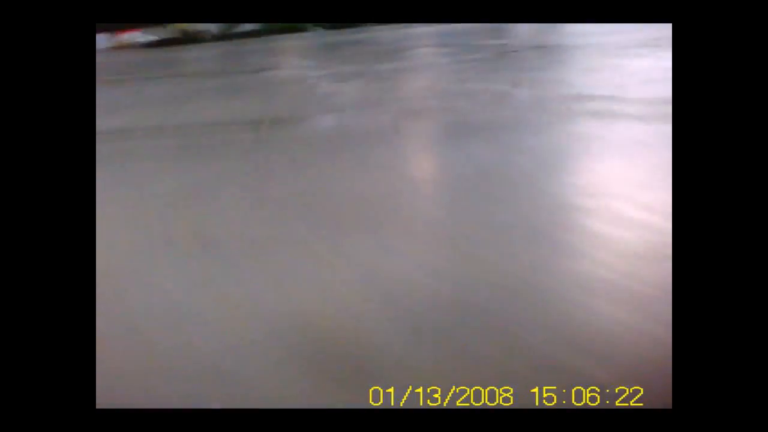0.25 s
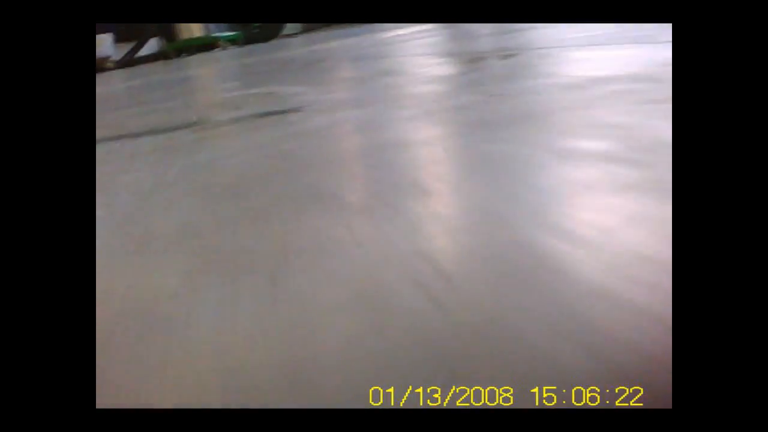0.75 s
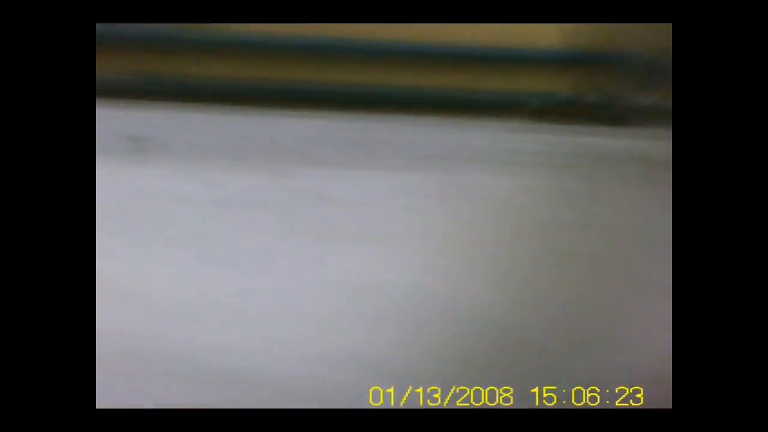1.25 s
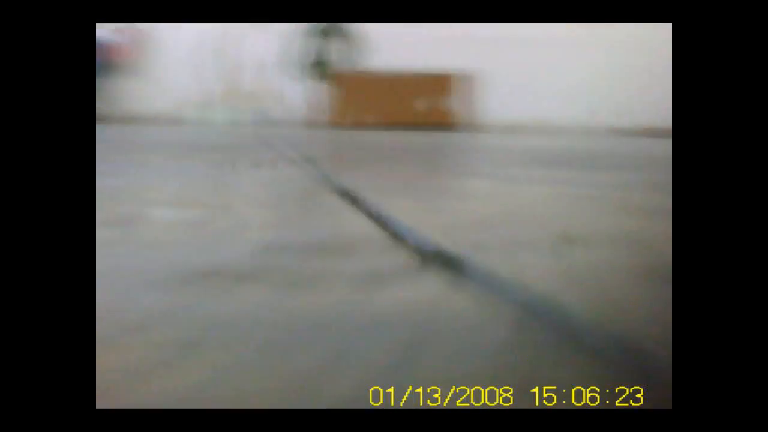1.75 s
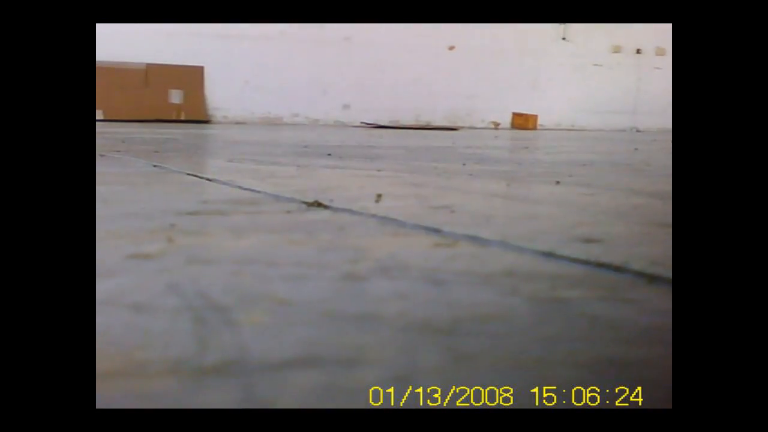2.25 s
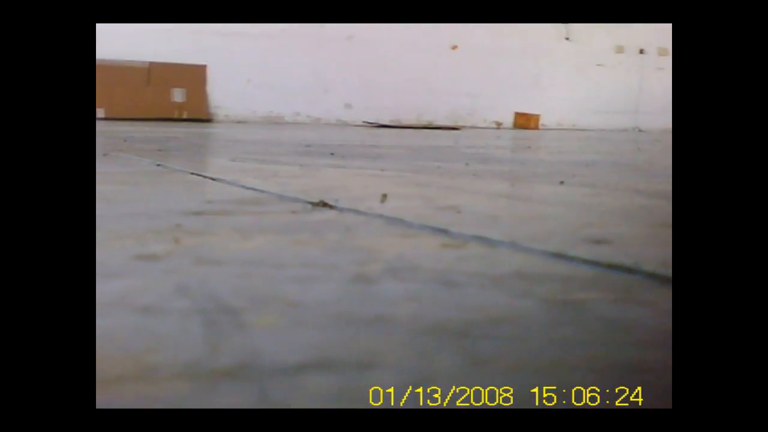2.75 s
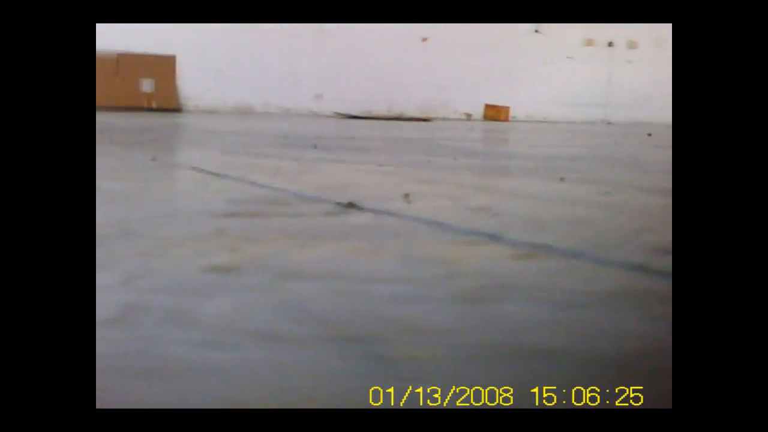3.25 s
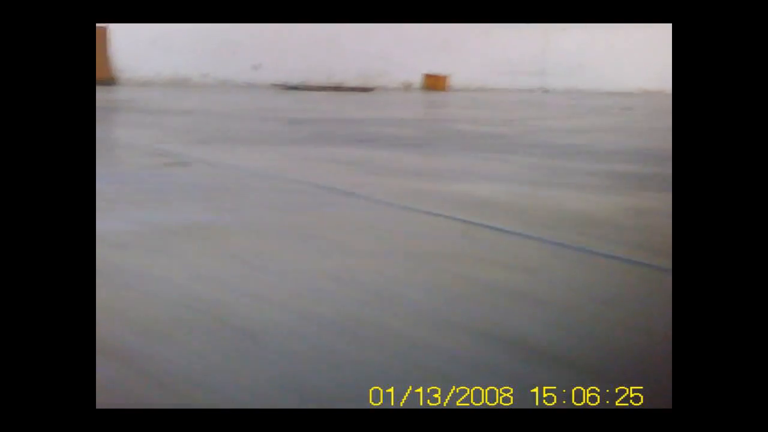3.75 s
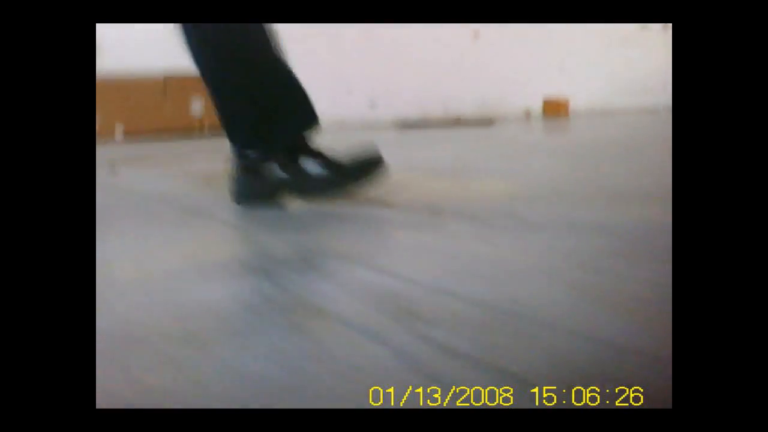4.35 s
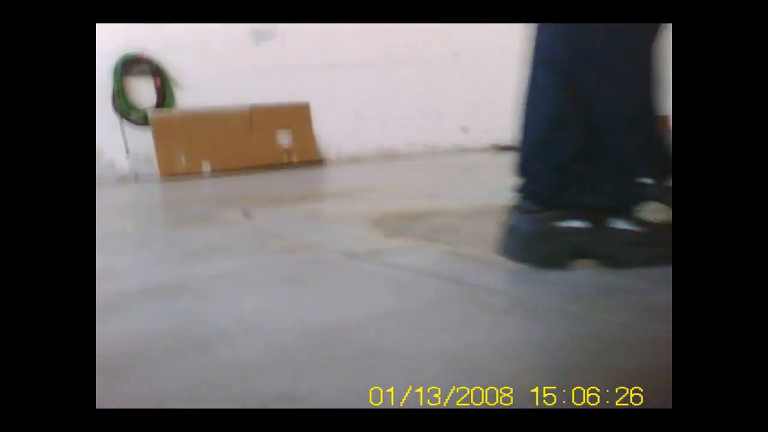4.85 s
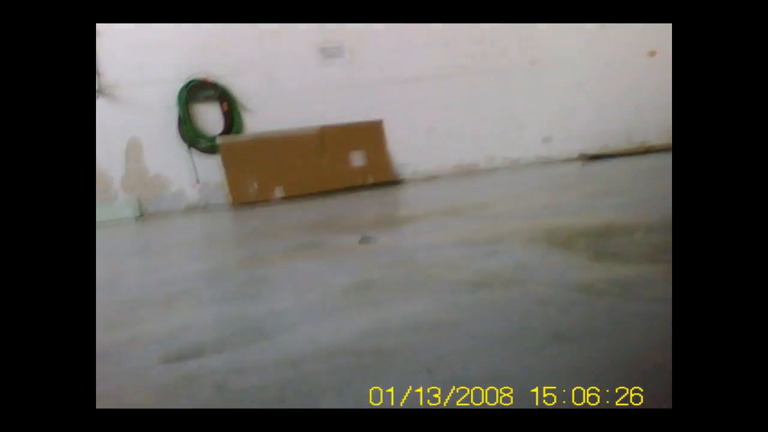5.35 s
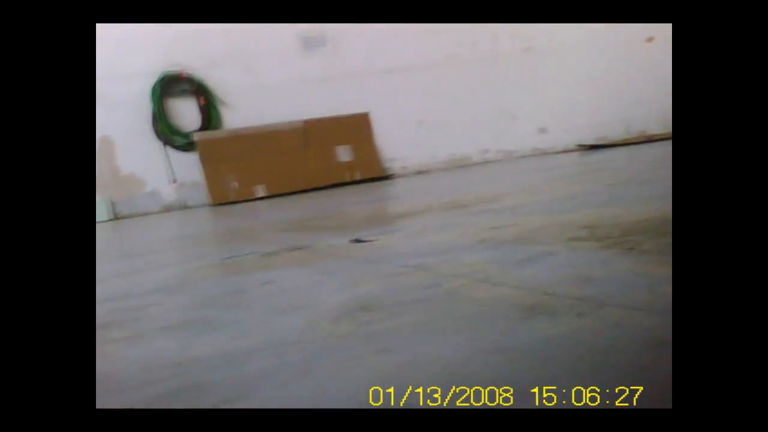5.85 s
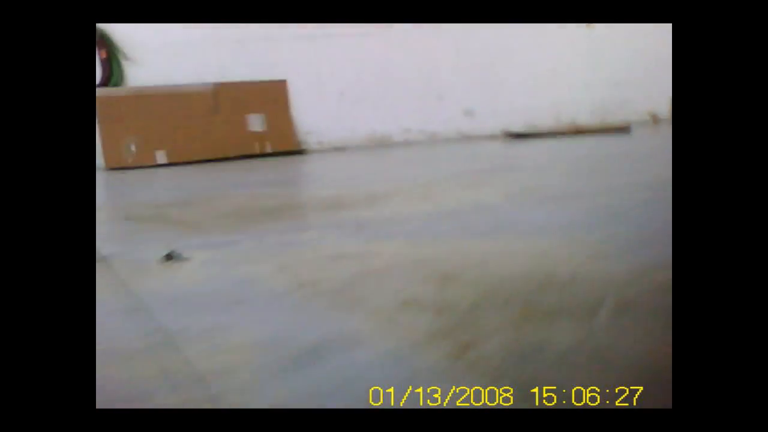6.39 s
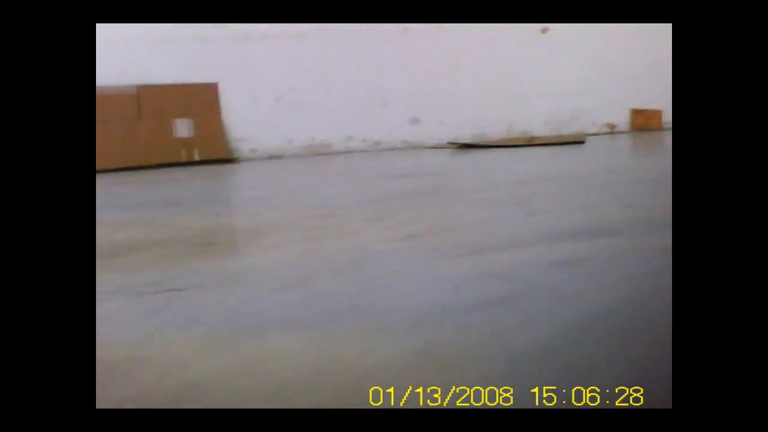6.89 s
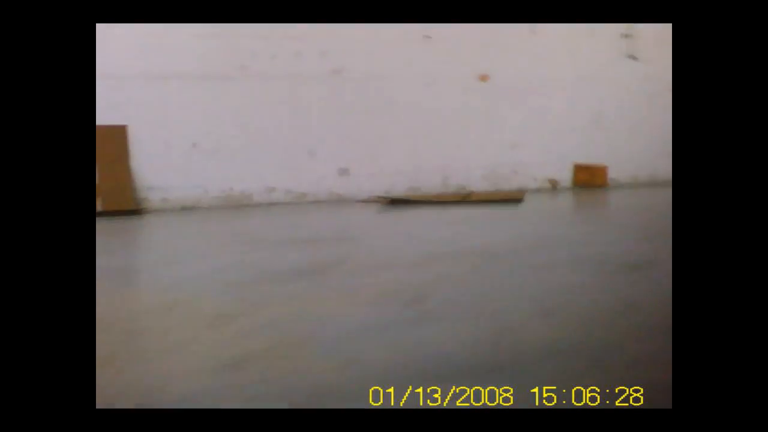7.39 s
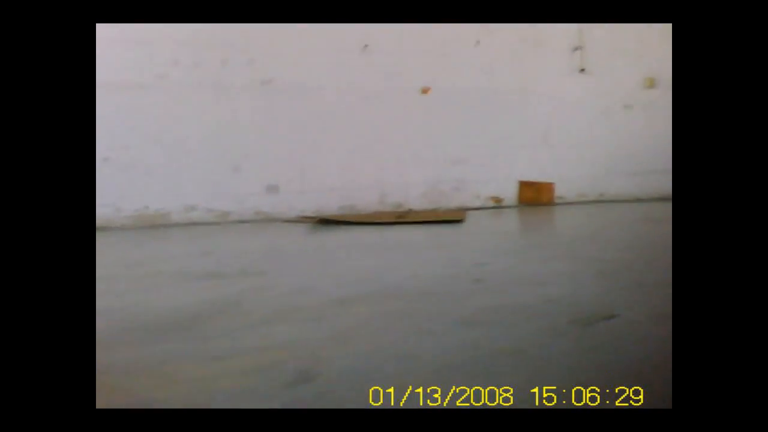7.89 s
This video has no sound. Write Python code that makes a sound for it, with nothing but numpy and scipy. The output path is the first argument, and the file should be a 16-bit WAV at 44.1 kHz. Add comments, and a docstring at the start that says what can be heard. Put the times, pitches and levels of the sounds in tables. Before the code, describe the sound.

Heard from on board, the small electric motor of a radio-controlled helicopter whirs with a high, hissy gear whine. It winds down and stutters as the machine skids over a hard hangar floor with a quick clatter of knocks. The whine climbs again, loud and raspy, briefly overloading the microphone with pops, then levels off into a steady whir that slowly grows louder above a faint low hum.

```python
"""A toy helicopter on a hangar floor, heard from a small camera riding on its plastic frame.
At first the motor runs steadily: gear teeth hiss and whine, the speed controller sings one note, the
tail motor wavers. Near 1 s the motor sags and the machine skids round, knocking and scraping. From
2.2 s it spools up; the microphone pops and overloads on one side of the wave. At the loudest whine the
camera's volume and clipping level drop abruptly, then creep back up as the motor runs on at speed."""
import sys
import numpy as np
from scipy import signal
from scipy.fft import rfft, irfft
from scipy.io import wavfile
from scipy.ndimage import uniform_filter1d

SR = 44100
rng = np.random.default_rng(int(sys.argv[2]) if len(sys.argv) > 2 else 0)


def digitize_waveform(pressure):
    """Quantize a signal to 16-bit integers and store it at the path in sys.argv[1].

    Rows of a 2-D input are taken as channels; values are limited to [-1, 1].
    """
    field = np.atleast_2d(pressure).T
    bounded = np.clip(field, -1, 1)
    quanta = np.round(bounded * 32767).astype(np.int16)
    wavfile.write(sys.argv[1], SR, quanta)


N = 358533
T = np.arange(N) / SR
PINION_TEETH = 9

# tooth rate of the motor pinion: t/s, f/Hz
TOOTH_RATE = [(0.0, 2776), (0.3, 2749), (0.9, 2762), (1.0, 2662), (1.2, 2275), (1.3, 2138), (1.4, 2030),
              (1.6, 1867), (1.9, 1682), (2.2, 1534), (2.3, 1554), (2.4, 1609), (2.5, 1725), (2.7, 1964),
              (2.9, 2194), (3.2, 2452), (3.5, 2654), (3.75, 2757), (4.1, 2771), (4.5, 2753), (5.0, 2762),
              (5.75, 2813), (6.25, 2783), (6.6, 2821), (7.25, 2833), (8.13, 2808)]
# the drive as heard: t/s, gear hiss/dB, frame drone/dB re hiss, controller note/dB re hiss
DRIVE_LEVELS = [(0.0, -36.5, 0.5, -5.5), (0.9, -33.5, -0.5, -5.5), (1.1, -39, 7, -5.5),
                (1.45, -39.5, 4.5, -6), (2.04, -43.5, 4, -6), (2.26, -36, 1.5, -11), (2.62, -33.5, -1, -15),
                (2.77, -38.5, 3.5, -11), (3.0, -39.5, 3.5, -9), (3.3, -38, 0, -11.5), (3.9, -35, -1, -8),
                (4.7, -31.5, -2, -8), (5.4, -30.5, -1, -8.5), (6.2, -27, -1.5, -9), (8.13, -27.5, -1, -8.5)]
# upper and topmost resonances of the frame: f/Hz, width/Hz, relative level/dB
HIGH_MODES = [(3624, 414, 1.5), (4143, 570, -4), (4420, 440, 0.5), (4682, 114, -3.5)]
TOP_MODES = [(5436, 980, -7.5), (6200, 270, -7), (6572, 610, -2), (7700, 860, -17.5), (8400, 1480, -12.5),
             (9055, 520, -10), (10170, 520, -20.5)]
# skids scraping the floor: t/s, level/dB
SCRAPE = [(0.86, -43), (0.94, -36), (1.06, -39), (1.26, -37), (1.38, -31.5), (1.52, -36.5), (1.81, -34),
          (2.0, -42), (2.12, -50)]


def gears(turn):
    """Teeth rub and tick, harder once a shaft turn; four ranges of the frame carry it to the camera."""
    # frame resonances of the drone, and those only fast teeth reach: f/Hz, width/Hz, relative level/dB
    low_modes = [(755, 61, -16.5), (1001, 330, -15), (1242, 543, -5.5), (1507, 177, -3), (1929, 430, 2.5),
                 (2080, 143, 1.5), (2392, 204, -7)]
    mid_modes = [(2708, 280, -3), (3057, 400, 0)]
    # shaft tones: multiple of the shaft rate, relative level/dB
    shaft_tones = [(1, -10.5), (3, -19.5), (4, -23), (5, -26), (6, -32), (7, -29.5), (8, -28), (10, -27),
                   (12, -27.5), (14, -33), (15, -23.5), (18, -15), (27, -19.5)]
    hiss_db, drone_db, _ = curves(DRIVE_LEVELS)
    speed = curves(TOOTH_RATE)[0] / TOOTH_RATE[-1][1]
    mid_db = -11 + 12 * np.log2(speed)
    top_db = -8 - 1.5 * (1 - pull())
    grain = np.repeat(np.minimum(rng.exponential(size=N // 24 + 1), 3.5), 24)[:N]
    pulse = 1 + 0.17 * np.cos(turn) + 0.088 * np.cos(turn / 2)
    shaft = undb(-17 + 19.5 * pull()) * tones(turn + 0.12 * walk(30), shaft_tones)
    imbalance = speed ** 5  # low shaft tones grow steeply with speed
    out, shared_db = 0, hiss_db + .5 * walk(17)
    for modes, db, grain_db, shaft_gain in ((low_modes, drone_db, 1.2, imbalance),
                                            (mid_modes, mid_db, 1.5, 1),
                                            (HIGH_MODES, 0, 2.2, 1), (TOP_MODES, top_db, 2, 1)):
        teeth = unit(rng.standard_normal(N) * undb(grain_db * grain) * pulse)
        ringing = unit(resonate(teeth + shaft * shaft_gain, modes, steep=2.27))
        out = out + ringing * undb(shared_db + db + .5 * walk(7.5))
    return out


def whine(turn):
    """The tooth tone: pulsing and with partner tones under load, in bare throbs when the teeth part."""
    # loaded teeth, loudest as the motor climbs through the frame resonance: t/s, level/dB
    loaded_levels = [(0, -53), (.9, -56), (1.15, -46.5), (1.3, -51), (2.15, -48.5), (2.25, -28),
                     (2.31, -28.5), (2.36, -19), (2.39, -24), (2.44, -21), (2.485, -26), (2.555, -17),
                     (2.6, -19), (2.6345, -14), (2.635, -18), (2.76, -19), (2.83, -27), (3, -33),
                     (3.15, -33.5), (3.4, -46), (3.8, -54), (5.1, -46), (5.5, -50), (8.13, -58)]
    # unloaded teeth meet and part while the rotor overruns the motor: t/s, level/dB, half length/s
    throbs = [(1.28, -30, .006), (1.351, -23, .005), (1.399, -27, 0.015), (1.449, -22, 0.0054),
              (1.481, -22.5, 0.016), (1.534, -19, 0.016), (1.573, -22.5, .01), (1.617, -19.5, 0.01),
              (1.668, -29.5, 0.015), (1.701, -29, 0.015), (1.747, -29.5, .012), (1.789, -37, .006),
              (1.951, -30, 0.0047), (2.005, -38, .009), (2.035, -40, .008), (2.083, -31.5, 0.0066),
              (2.127, -40, .011), (2.17, -35, .008)]
    # partner tones: multiple of the shaft rate, level/dB re the loaded whine before any lift
    partners = [(6, -29), (8, -29), (10, -30), (18, -32), (27, -39), (36, -46), (45, -45)]
    # frame resonances that lift a passing partner: f/Hz, width/Hz, gain/dB
    lifts = [(1520, 110, 12), (1980, 240, 17), (6600, 700, 14)]
    pulse_hz, pulse_peak_s, pulse_db, sputter_db = 16.4, 2.628, 2, 4
    pulse = np.cos(2 * np.pi * pulse_hz * (T - pulse_peak_s))
    level = loaded = undb(curves(loaded_levels)[0] + pulse_db * pulse)
    for s, db, half_length in throbs:
        level = level + undb(db) * bell(T, s, half_length)
    # uneven teeth shake size and timing of the tone, which puts a rasp around it
    tooth = (1 + 0.24 * walk(350)) * np.sin(PINION_TEETH * turn - 2 * np.pi / 5 + 0.12 * walk(300))
    shaft_hz = curves(TOOTH_RATE)[0] / PINION_TEETH
    lifted = [(k, db + sputter_db * walk(30.03) + bumps(k * shaft_hz, lifts)) for k, db in partners]
    # a tone one shaft multiple above twice the tooth rate comes in late
    upper_db = np.interp(T, (4.7, 4.2, 6.3), (-71, -63, -46)) + 2 * walk(10)
    upper = undb(upper_db) * np.sin((2 * PINION_TEETH + 1) * turn + 1.3 * walk(30))
    return np.sqrt(2) * (level * tooth + upper) + loaded * tones(turn + .025 * walk(200), lifted)


def skids():
    """Skids just under the camera scrape and knock; a knock is a dull ring, thud, tick and frame ring."""
    # knocks on the floor: t/s, dull ring gain/dB, f/Hz, frame ring/dB, tick peak/dB
    knocks = [(0.915, -16.5, 1306, -31, -34), (0.928, -18.5, 1320, -36, -37), (0.992, -27, 1290, -23, -32),
              (1.074, -29.5, 1170, -15.5, -38), (1.122, -16, 990, -25, -21), (1.157, -33, 1340, -23, -45),
              (1.212, -18.5, 1550, -30, -31), (1.234, -19, 1090, -32, -28.5), (1.315, -20.5, 920, -23, -24),
              (1.343, -17, 1100, -30, -34), (1.383, -18.5, 1080, -30, -27), (1.404, -19.5, 1090, -23, -36),
              (1.463, -29, 1090, -20, -32), (1.572, -24, 1160, -30, -33), (1.617, -29, 1230, -25, -34),
              (1.636, -21, 1210, -35, -47), (1.653, -18.5, 1220, -27, -30), (1.699, -30, 1130, -32, -29),
              (1.763, -29.5, 1050, -23, -33), (1.79, -21.5, 1110, -21.5, -31), (1.857, -26, 1090, -44, -32),
              (1.92, -27, 1080, -32, -38), (1.997, -30.5, 1000, -33, -35)]
    scrape_modes = [(898, 270, -3.5), (1120, 210, 2), (1400, 590, -1)]  # f/Hz, width/Hz, level/dB
    grit = rng.standard_normal(N) * undb(3.8 * walk(69.88))
    out = unit(resonate(grit, scrape_modes)) * undb(curves(SCRAPE)[0]) * sliding()
    t = T[:4000]
    frame_ring = np.sin(2 * np.pi * 1940 * t) * np.exp(1 - t / 0.0048) * t / 0.0056
    thud = undb(-24) * np.sin(2 * np.pi * 45 * t) * np.exp(-t / 0.028)
    for s, db, hz, frame_db, tick_db in knocks:
        ring = np.sin(2 * np.pi * hz * t) * np.exp(-t / 0.0038) * (1 - np.exp(-t / 0.00041))
        burst = rng.standard_normal(len(t)) * np.exp(-t / 0.0096)
        tick = resonate(burst, HIGH_MODES + TOP_MODES)[:len(t)]
        tick = undb(tick_db) * tick / np.abs(tick).max()
        start = int(s * SR)
        out[start:start + len(t)] += undb(db) * (ring + thud) + tick + undb(frame_db) * frame_ring
    return out


def controller(hz=1703):
    """The speed controller chops the motor current and sings one unchanging note."""
    hiss_db, _, note_db = curves(DRIVE_LEVELS)
    return np.sqrt(2) * undb(hiss_db + note_db + 1.2 * walk(10)) * np.sin(2 * np.pi * hz * T)


def tail_motor():
    """Overtones of the tail motor shaft flicker where two bands of the frame pass them."""
    # shaft rate: t/s, f/Hz
    shaft_rate = [(0, 168), (.14, 174.5), (.27, 166.5), (.55, 168), (.76, 175.5), (1, 170), (3.7, 152),
                  (4.1, 168), (4.35, 174.7), (4.65, 169.5), (4.8, 173), (5.1, 172.5), (5.28, 175),
                  (5.6, 166.5), (5.9, 173.5), (6.03, 174), (6.2, 165), (6.85, 167.5), (7.2, 163.5),
                  (7.5, 165.5), (8.13, 166)]
    # pass bands of the frame: f/Hz, half width/Hz
    bands = [(2425, 90), (2625, 110)]
    hz, = curves(shaft_rate)
    turn = 2 * np.pi * np.cumsum(hz) / SR + .05 * walk(30)
    overtones = 0
    for k in (14, 15, 16):
        passed = sum(bell(k * hz, centre, width) for centre, width in bands)
        overtones = overtones + passed * undb(3.5 * walk(9)) * np.sin(k * turn)
    running = (T < 1) | (T > 3.6)
    return np.sqrt(2) * undb(curves(DRIVE_LEVELS)[0] - 17) * overtones * running


def microphone_pops(dent_s=0.00043, thump_s=0.0052):
    """The overloaded microphone pops: short downward dents with a slower rebound and a thump."""
    # pops: t/s, dent level/dB
    pops = [(2.552, -34), (2.609, -33), (2.63, -20), (2.635, -25), (2.661, -31), (2.674, -27), (2.691, -28),
            (2.708, -27), (2.735, -24.5), (2.748, -30)]
    out = 0
    for s, db in pops:
        dent = bell(T, s + dent_s, dent_s)
        rebound = 0.12 * bell(T, s + 5 * dent_s, 3 * dent_s)
        thump = undb(-14) * bell(T, s, thump_s)
        out = out - undb(db) * (dent - rebound + thump)
    return out


def low_hum():
    """A low, unsteady hum near 166 Hz, with a higher ring that grows while the skids slide."""
    # the hum: t/s, level/dB
    hum_levels = [(0, -83), (.2, -62.5), (.75, -69.5), (.94, -60), (1.2, -60), (1.42, -49), (1.55, -54.5),
                  (1.81, -47.5), (2, -54.5), (2.15, -81), (2.4, -66), (2.72, -54), (2.94, -77), (4.1, -70),
                  (4.4, -57), (5.8, -59.5), (6.1, -56), (8.13, -58)]
    # bands of the hum and the ring: f/Hz, width/Hz
    bands = [(166, 20.5), (470, 63)]
    hum_db, = curves(hum_levels)
    hum, ring = (unit(resonate(rng.standard_normal(N), [(hz, w, 0)], steep=2.8)) for hz, w in bands)
    return hum * undb(hum_db) + ring * (undb(-61.5) * sliding() + undb(hum_db - 12.5))


def rumble():
    """A deep rumble that follows the level of the gear hiss."""
    # rumble spectrum: f/Hz, relative level/dB
    spectrum = [(12, -25), (20, 29.5), (126, 3.5), (166, -15.5), (199, -32), (317, -11), (393, -32),
                (800, -6.5), (1040, -27), (1760, -120)]
    hz, db = np.transpose(spectrum)
    f = np.maximum(np.fft.rfftfreq(N, 1 / SR), 1)
    gain = undb(np.interp(np.log(f), np.log(hz), db))
    noise = irfft(rfft(rng.standard_normal(N)) * gain, N)
    return unit(noise) * undb(curves(DRIVE_LEVELS)[0] - 22.5)


def resonate(x, modes, steep=2.0):
    """The path to the microphone: steep resonance peaks, then the notches of the camera case."""
    # colouring of the case: f/Hz, width/Hz, gain/dB
    case = [(4990, 94, -7.5), (6980, 83, -13), (9500, 200, 0.5)]
    f = np.maximum(np.fft.rfftfreq(4096, 1 / SR), 1)
    power = sum(undb(2 * db) / (1 + ((f - hz ** 2 / f) / w) ** 2) ** steep for hz, w, db in modes)
    power = power * undb(2 * bumps(f, case))
    cepstrum = irfft(np.log(power + 1e-12) / 2)
    cepstrum[1:2048] *= 2  # minimum phase: the ringing follows the blow
    cepstrum[2049:] = 0
    return signal.oaconvolve(x, irfft(np.exp(rfft(cepstrum))))[:N]


def pull(coast_s=1.094, cut_s=0.05, throttle_on_s=2.2, bite_s=.4):
    """1 while the motor drives the rotor, 0 while it coasts."""
    return np.clip(np.maximum((coast_s - T) / cut_s, (T - throttle_on_s) / bite_s), 0, 1)


def sliding():
    """1 while the skids slide, else 0, with soft edges."""
    return np.clip(np.minimum(T - SCRAPE[0][0], SCRAPE[-1][0] - T) / 0.059, 0, 1)


def tones(turn, table):
    """Sines locked to the shaft angle, each flickering by itself."""
    fastest_hz = np.gradient(turn).max() * SR / (2 * np.pi)
    return sum(np.sqrt(2) * undb(db + 0.9 * walk(12)) * np.sin(k * turn + k * k)
               for k, db in table if k * fastest_hz < SR / 2)


def walk(rate):
    """Random levels held 1 / rate s and smoothed twice; spread near 1."""
    hold = int(SR / rate)
    steps = np.repeat(rng.standard_normal(N // hold + 1), hold)
    return 1.08 * uniform_filter1d(uniform_filter1d(steps, hold), hold)[:N]


def curves(table):
    """The columns after t/s, one value a sample."""
    s, *columns = np.transpose(table)
    return [np.interp(T, s, column) for column in columns]


def bumps(f, table):
    """Gain in dB at f from bell-shaped peaks and dips."""
    return sum(db * bell(f, hz, width) for hz, width, db in table)


def bell(x, centre, width):
    return np.exp(-((x - centre) / width) ** 2)


def undb(db):
    return 10 ** (np.asarray(db) / 20)


def unit(x):
    return x / np.sqrt(np.mean(x ** 2))


def scene():
    """Everything at the one on-board microphone, the same in both channels."""
    turn = 2 * np.pi * np.cumsum(curves(TOOTH_RATE)[0]) / PINION_TEETH / SR  # motor shaft angle/rad
    drive = gears(turn) + whine(turn) + tail_motor() + controller()
    mono = drive + skids() + low_hum() + rumble() + microphone_pops()
    return np.array([mono, mono])


def record(dry):
    """The microphone squashes upward swings and stretches downward ones until they clip."""
    # clipping level; it drops abruptly with the camera's volume and creeps back up: t/s, level/dB
    clip_levels = [(0, -10), (1.1, -10.5), (1.7, -11.5), (2.1, -5), (2.5, -6), (2.6345, -6), (2.635, -12),
                   (2.76, -12), (3.2, -13), (6.3, -2), (8.13, -3.5)]
    ceiling = undb(curves(clip_levels)[0])
    bend, offset = .8, -.004
    bent = ceiling * np.maximum((1 - np.exp(-bend * dry / ceiling)) / bend, -1)
    bent = signal.sosfilt(signal.butter(1, 3.0, "high", fs=SR, output="sos"), bent) + offset
    # the converter dulls the top
    dulled = signal.sosfilt(signal.butter(4, 10000, fs=SR, output="sos"), bent)
    return signal.sosfilt(signal.ellip(10, .2, 70, 11000, fs=SR, output="sos"), dulled)


dry = scene()
out = record(dry)
digitize_waveform(out)
```